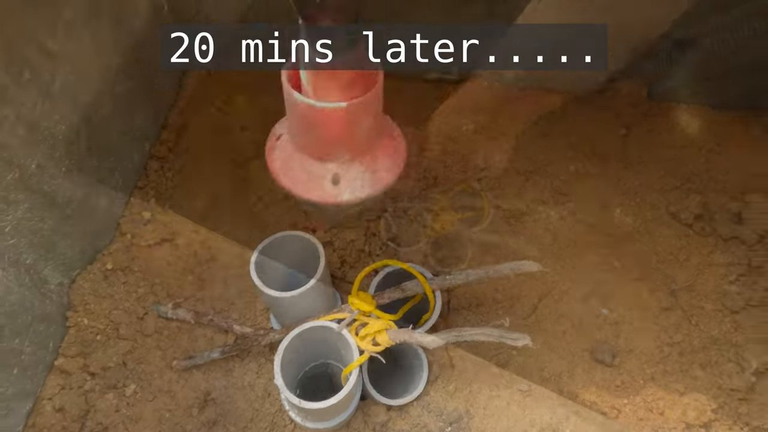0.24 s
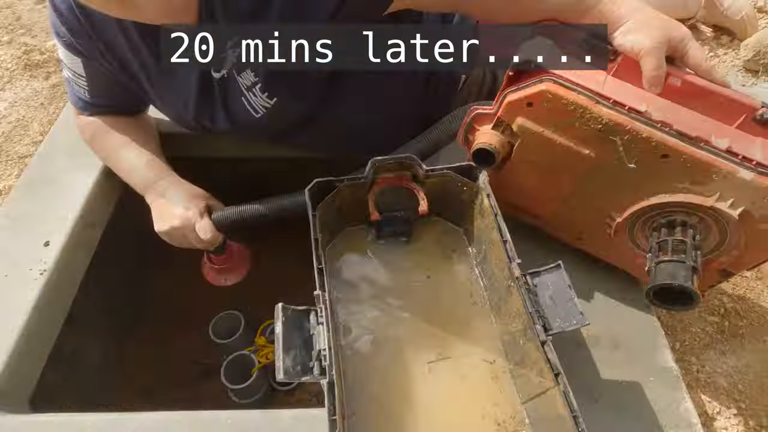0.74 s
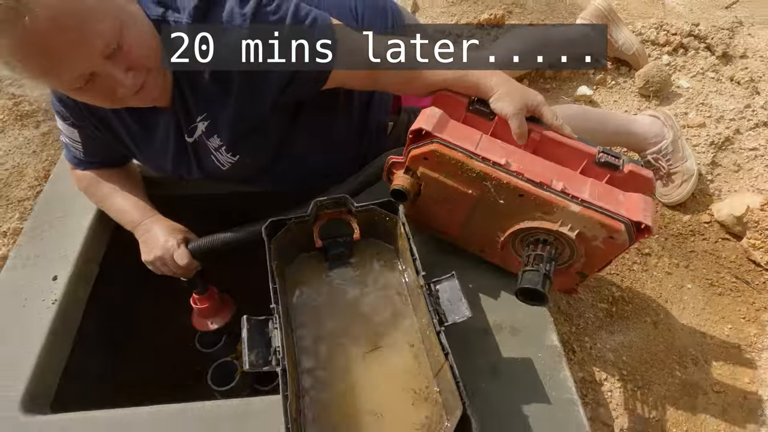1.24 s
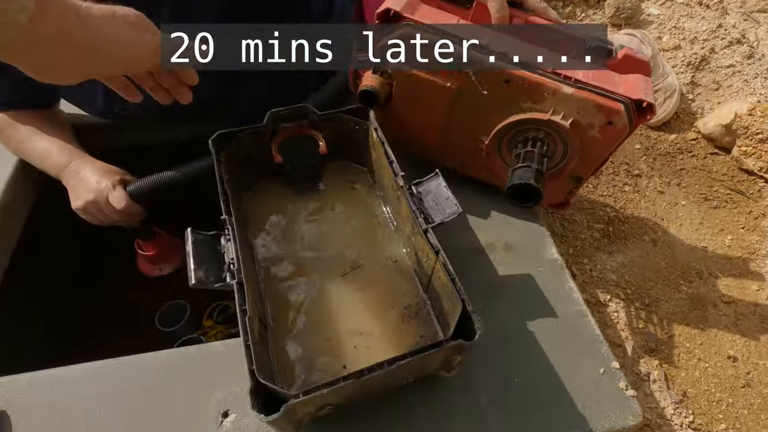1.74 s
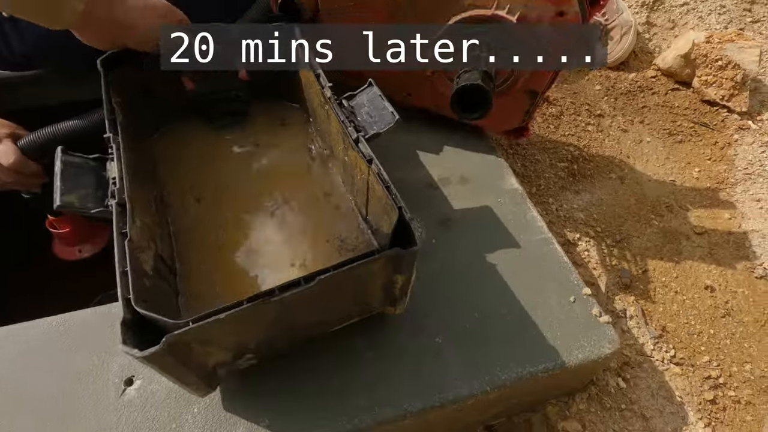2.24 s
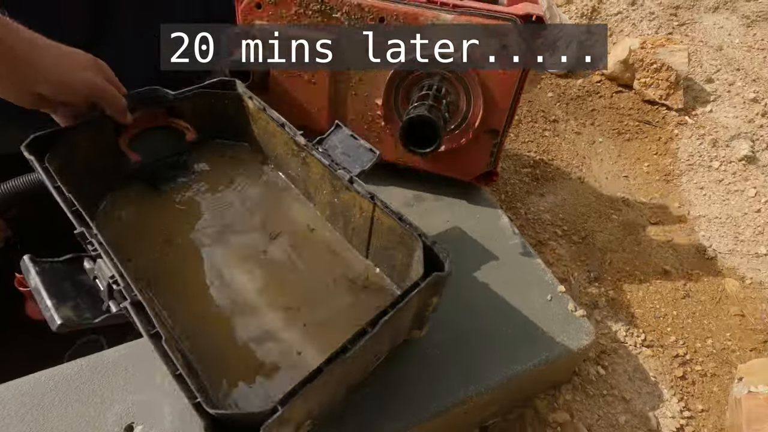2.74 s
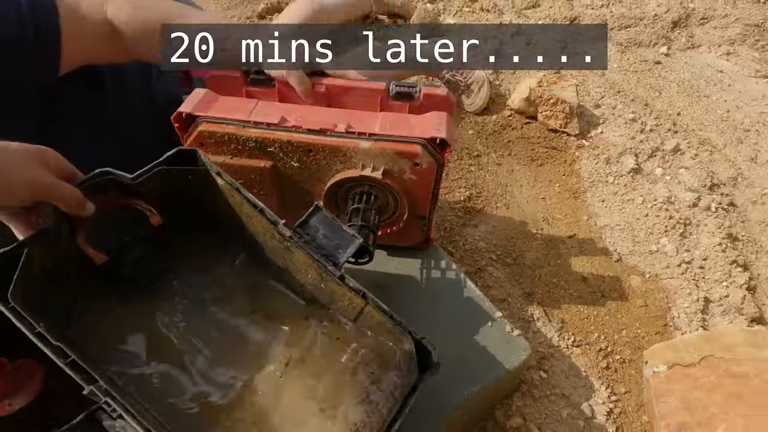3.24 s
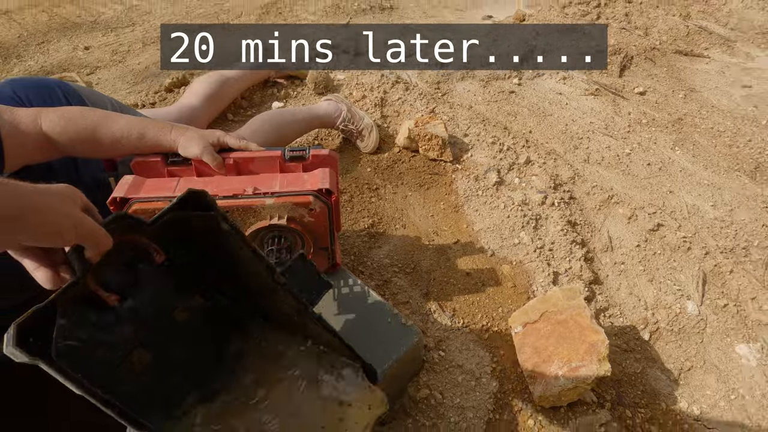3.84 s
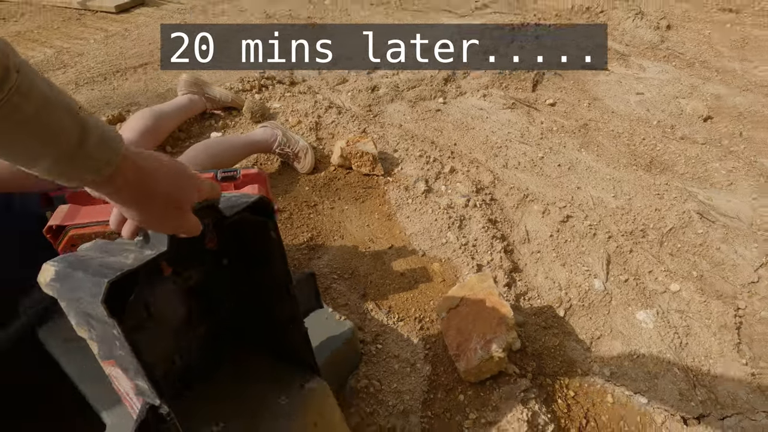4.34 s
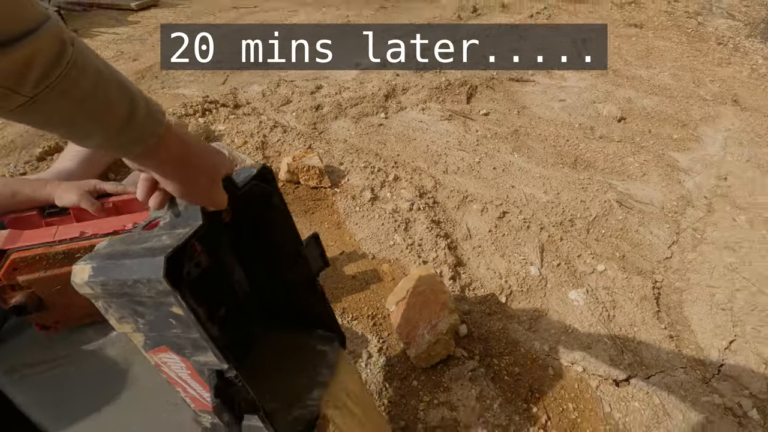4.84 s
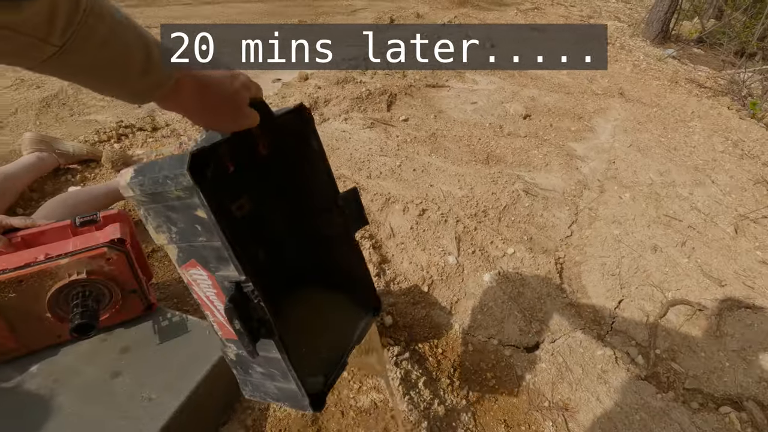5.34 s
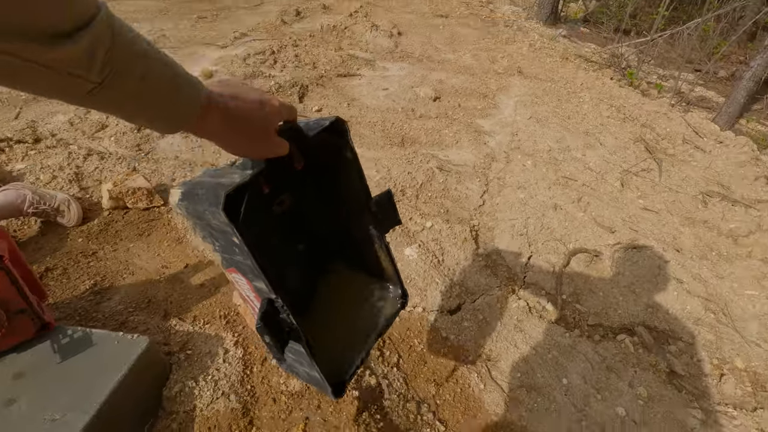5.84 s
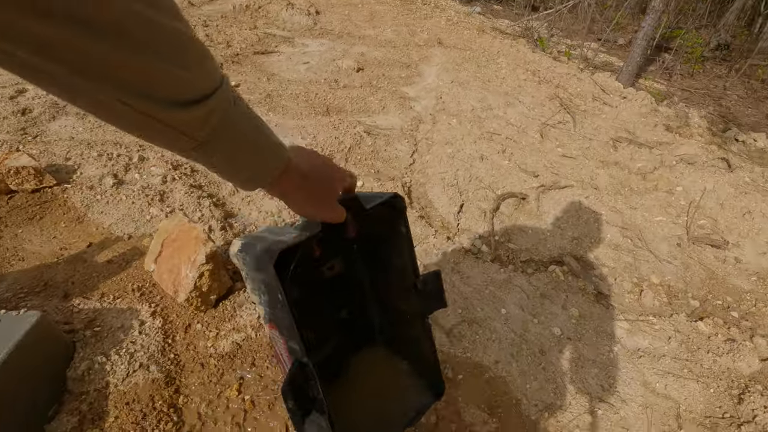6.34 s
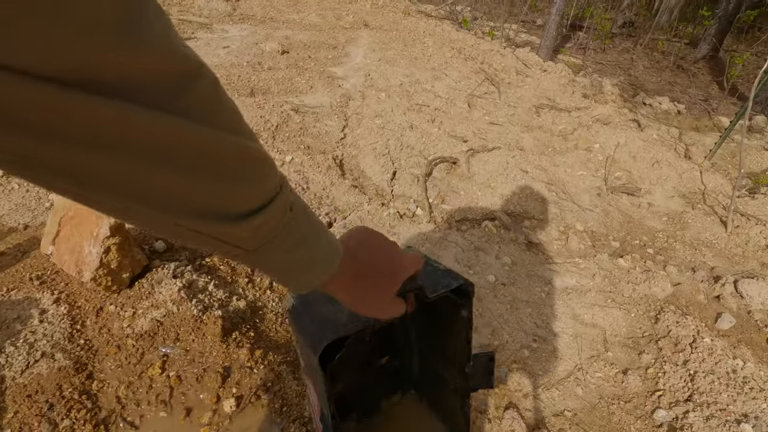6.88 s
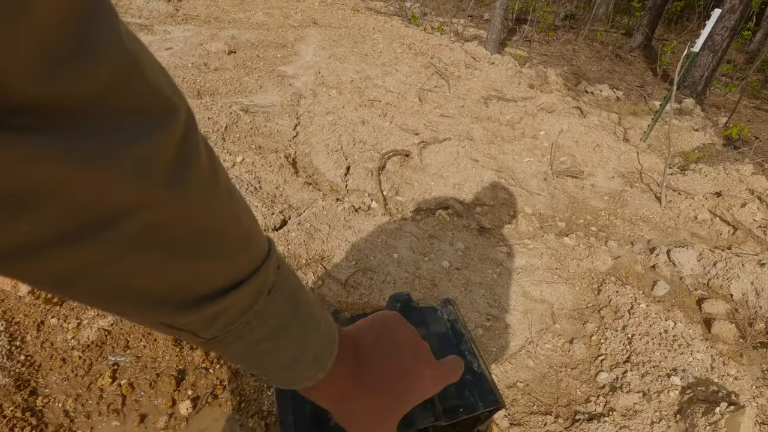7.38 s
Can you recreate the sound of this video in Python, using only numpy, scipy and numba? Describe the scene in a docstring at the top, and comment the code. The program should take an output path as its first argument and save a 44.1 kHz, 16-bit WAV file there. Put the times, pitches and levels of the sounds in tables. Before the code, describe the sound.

A small wet vacuum whines and gurgles, cuts off abruptly, then a plastic tub scrapes over concrete, muddy water pours onto dirt and drips away.

```python
"""Outdoors at a pit: a small wet vacuum whines (shaft and blade tones, turbulent air, gurgling hose) until a hard cut.
After it a far engine idles on wavering harmonics over a murmur of noise. A plastic tub of muddy water is dragged over
a concrete box, tipped and poured on dry ground, and set down: slips and bumps ring its walls, grit rustles, and the
water is built of rising bubbles, fizz and short smacks. Something hollow is knocked now and then, as short modal rings."""
import sys
import numpy as np
from scipy import signal
from scipy.fft import rfft, irfft, next_fast_len
from scipy.io import wavfile
from numba import njit

SR = 44100
rng = np.random.default_rng(int(sys.argv[2]) if len(sys.argv) > 2 else 0)


def volts_from_decibels(level):
    """Turn decibel levels (scalar or array-like) into linear amplitude factors."""
    exponent = np.asarray(level, float) / 20
    return 10 ** exponent


def waveform_to_disk(signal):
    """Save audio, clipped to [-1, 1], as 16-bit WAV at the path in sys.argv[1]."""
    frames = np.transpose(np.atleast_2d(signal))
    scaled = np.clip(frames, -1, 1) * 32767
    samples = np.round(scaled).astype(np.int16)
    wavfile.write(sys.argv[1], SR, samples)


N = 335601
CUT_S = 1.2885   # the vacuum stops and the open-air bed starts

# Open-air bed, whose whole level dips and recovers: [t/s, engine cycle f/Hz, bed level/dB]
OPEN_AIR_BED = [(1.29, 22.12, -51.5), (2.5, 22.35, -51), (3.2, 22.04, -59), (3.85, 22.2, -55.5),
                (4.5, 22.23, -50), (5.3, 22.35, -50), (6.1, 22.83, -50), (6.6, 22.6, -51),
                (7.2, 22.17, -59.5), (7.61, 22.33, -52)]
# Engine harmonics: [multiple of the cycle, relative level/dB]
ENGINE_ORDERS = [(1, -36), (2, -12), (3, -12), (4, -10), (5, -7), (6, -18), (7, -15), (8, -3), (9, -4),
                 (10, -2), (11, -7), (12, -1), (13, -6), (14, -8), (15, -14), (16, -11), (17, -13),
                 (18, -20), (19, -18), (20, -16)]
# Spectrum of the open-air murmur: [f/Hz, relative level/dB per Hz]
MURMUR_SPECTRUM = [(30, -22), (60, -17), (110, -18), (250, -13), (400, -17), (800, -17), (1500, -20),
                   (2150, -18), (2700, -23), (5000, -31), (7000, -39), (8500, -52), (10800, -48),
                   (12500, -60), (14200, -72)]
# Rustle of hands and grit: [peak t/s, level/dB, t/s to rise 20 dB, t/s to fall 20 dB]
RUSTLES = [(1.8, -62, 3., .25), (2.28, -54, .4, .5), (3.6, -62, .8, .5), (7.12, -59, .2, .4),
           (7.35, -55, .25, 1.4)]
# Spectrum of grit: [f/Hz, relative level/dB per Hz]
GRIT_SPECTRUM = [(500, -33), (1000, -12.5), (2800, -11), (5000, -19), (7300, -31), (8800, -40),
                 (11000, -33.5), (12800, -56), (14200, -58)]
# Modes the hollow knocks ring with: [f/Hz, relative level/dB, t60/s]
HOLLOW_MODES = [(430, -6.5, 0.12), (532.4, 5, 0.1), (640, 6, 0.045), (690, -21, 0.056), (843, 5.5, 0.035),
                (1054, -11.5, 0.057), (1430, -3, 0.019), (1500, -7.5, 0.04), (1620, -11, .025)]
# Hollow knocks: [t/s, relative level/dB, hardness/dB per octave]
HOLLOW_KNOCKS = [(1.419, -44, 5), (1.496, -25, 5.5), (1.505, -34.5, 2), (1.967, -31.5, 12),
                 (2.035, -48, 16), (4.713, -31.5, -3), (5.335, -28, 3.5), (5.926, -32.5, 6),
                 (6.281, -44.5, 13), (6.54, -30.5, 1.5), (7.019, -35, 4), (7.156, -39, 4)]
# Air rushing through the vacuum housing: [f/Hz, relative level/dB per Hz]
RUSH_SPECTRUM = [(310, -22), (520, -8), (1260, -8), (1960, -0.5), (2970, -4.5), (3660, -5.5), (7110, -14),
                 (8990, -22.5), (11100, -18.5), (14200, -42)]
# Resonances of the vacuum housing: [f/Hz, width/Hz, relative level/dB]
HOUSING_MODES = [(1544, 17, 4.5), (1860, 40, -3), (1957, 28, 0), (2110, 47, -4), (2644, 45, 0),
                 (3120, 57, -1.5), (3290, 34, 4), (3460, 52, -0.5), (6220, 40, 0), (6670, 50, 0),
                 (7390, 60, 0), (6880, 60, 3)]
# Water rumbling in the hose: [f/Hz, relative level/dB per Hz]
GURGLE_SPECTRUM = [(24, -50), (40, -8), (112, -13), (212, 0), (254, -3.5), (294, -8.5), (400, -9.5),
                   (520, -43), (880, -120)]
# Chatter of the rim and singing of one wall mode: [t/s, length t/s, f/Hz, level/dB]
RIM_SQUEAKS = [(2.39, 0.045, 560, -50), (2.505, 0.045, 680, -51), (2.561, 0.033, 700, -46),
               (2.609, 0.03, 702, -45), (1.977, .17, 2140, -63.5), (2.722, 0.056, 1280, -38)]
# Shoves over concrete and soil: [peak t/s, level/dB, t/s to rise 20 dB, t/s to fall 20 dB, bite level/dB of the ribs]
SHOVES = [(2.64, -50, .5, .12, 0.), (2.73, -45, .05, .2, 5.), (2.772, -35, .07, .03, -3.),
          (2.82, -42, .06, .06, -6.), (2.87, -47, .03, .2, 11.), (2.97, -48, .2, .08, 3.),
          (3.05, -49, .06, .1, 6.), (3.105, -48, .12, .03, -6.), (4.024, -47, .19, .09, -10.),
          (6.946, -40.5, .055, .09, -4.), (7.05, -50, .03, .04, 3.), (7.25, -53, .02, .45, 2.)]
# Modes of the plastic walls: [f/Hz, relative level/dB, t60/s after a bump]
TUB_MODES = [(135, -19.5, 0.16), (165, -22., 0.1), (199.4, -8.5, 0.12), (266, 1, 0.083), (345, -.5, 0.11),
             (452, -19, 0.045), (556, 5.5, 0.045), (702, 4, 0.03), (828, 1.5, 0.026), (900, 0.5, 0.021),
             (1082, 4, 0.02), (1280, -9.5, 0.04), (1600, -10, 0.047)]
# Tub bumps: [t/s, relative level/dB, favoured region f/Hz, relative crack level/dB]
TUB_BUMPS = [(0.17, -17, 800, -42), (0.177, -19, 190, -47), (0.192, -23, 600, -50), (1.56, -23.5, 234, -55),
             (1.578, -27.5, 267, -49), (2.575, -24.5, 134, -57), (2.68, -32, 600, -52),
             (2.694, -32, 800, -47), (2.702, -16, 221, -52), (2.755, -23, 230, -46), (2.773, -13, 267, -58),
             (2.817, -20, 250, -39), (2.857, -9, 165, -30), (2.886, -15, 140, -33), (2.9, -26, 650, -44),
             (2.916, -25, 291, -42), (2.936, -19.5, 293, -34), (2.957, -40, 600, -45),
             (2.972, -23, 650, -35), (3.006, -40, 280, -42), (3.039, -40, 500, -45),
             (3.043, -17.5, 170, -46), (3.051, -42, 500, -47), (3.065, -42, 300, -45),
             (3.08, -35, 129, -42), (3.089, -25, 140, -56), (3.113, -39, 137.1, -51),
             (5.999, -34, 450, -52), (6.93, -34, 150, -59), (6.943, -29.5, 359, -51),
             (6.968, -39, 300, -53), (7.046, -26, 342, -56), (7.118, -32, 280, -55), (7.235, -17, 620, -48),
             (7.241, -17, 370, -52), (7.256, -19, 380, -44), (7.275, -32, 900, -52), (7.321, -23, 220, -45),
             (7.368, -20, 600, -49), (7.399, -30, 340, -56), (7.413, -31, 400, -58)]
# A bump lands as three growing touches: [relative level/dB]
TOUCH_LEVELS = [-7, -3, 0]
# The edge skids and hisses: [peak t/s, level/dB, t/s to rise 20 dB, t/s to fall 20 dB]
EDGE_SKID = (2.772, -45, .07, .008)
# Spectrum of splashing water: [f/Hz, relative level/dB per Hz]
SPLASH_SPECTRUM = [(260, -16), (450, -48), (543, -21), (640, -26), (1400, -14), (2470, 1.5), (4220, 5.5),
                   (7100, -13), (8940, -28.5), (10900, -17), (14200, -50)]
# The tilt lets the water out: [t/s, nominal splash level/dB]
POUR = [(3.96, -80), (4.01, -55), (4.06, -48), (4.14, -48), (4.21, -43), (4.29, -43.5), (4.34, -39),
        (4.42, -37), (4.68, -37.5), (4.8, -40.5), (4.9, -37), (5.26, -45.5), (5.52, -50), (5.73, -54),
        (5.88, -64), (6.22, -75), (6.9, -78)]
# Last gushes shaken over the rim: [peak t/s, level/dB, t/s to rise 20 dB, t/s to fall 20 dB]
RIM_GUSHES = [(5.36, -48, .03, .15), (6.045, -54, .03, .1), (6.31, -47.5, .035, .27),
              (6.585, -45.5, .03, .18)]
# Single bubbles of sloshing water, low and high: [t/s, level/dB, starting f/Hz, length/cycles, pitch rise/share]
SLOSH_BUBBLES = [(3.323, -49, 1250, 75, 0.89), (3.394, -47, 750, 10, .08), (3.503, -44.5, 1774, 28, .04),
                 (3.548, -43.5, 2340, 20, 0.06), (3.627, -47, 1810, 30, .15), (3.47, -48, 500, 10, .04),
                 (3.672, -53, 1700, 70, .8), (4.219, -33, 2800, 16, .3), (4.32, -32, 4100, 20, .1),
                 (4.394, -28, 2750, 14, .1), (4.421, -25, 3300, 14, .2), (4.572, -31, 2500, 12, .2),
                 (4.64, -28, 2200, 22, .25), (4.682, -31, 1900, 12, .2), (4.135, -44, 900, 5.3, 0.84),
                 (4.503, -32.5, 640, 5.3, 0.28), (4.516, -22.5, 2350, 15, 0.92),
                 (4.55, -27, 2740, 14, 0.54), (4.809, -37.5, 820, 11, 0.26), (5.02, -37.5, 797, 8.7, .3),
                 (6.109, -43, 1200, 10, .15), (7.064, -42, 2870, 25, .05), (7.104, -41, 2470, 22, .12),
                 (3.586, -48, 835, 18, .06), (3.609, -48, 2950, 18, .12)]
# Short bright smacks, mostly drops, also the snap of a knock and cracks of the tub:
# [t/s, relative level/dB, relative f/Hz]
BRIGHT_SMACKS = [(1.505, -40, 5000), (3.3298, -43, 3300), (3.475, -50, 7000), (3.5728, -40, 4000),
                 (3.8222, -48, 4400), (4.059, -36, 6000), (4.093, -39, 2200), (4.121, -38, 2708),
                 (4.252, -27, 2205), (4.2689, -25, 2680), (4.3075, -25, 3080), (5.1125, -22, 4040),
                 (5.5937, -27.5, 3000), (5.622, -31, 3490), (5.7633, -19.5, 3580), (5.777, -35, 4600),
                 (5.8027, -31.5, 2900), (5.814, -37, 4200), (5.858, -38, 3800), (6.418, -36, 5200),
                 (5.918, -36, 4000), (5.953, -36.5, 3970), (6.0307, -34, 5500), (6.056, -35, 5000),
                 (6.135, -39, 5000), (6.0781, -27, 4020), (6.0869, -22.5, 3820), (6.312, -30, 4900),
                 (6.3861, -31, 4440), (6.4814, -33, 3930), (6.541, -23.5, 2800), (6.617, -34, 3700),
                 (6.76, -38, 4600), (6.792, -41, 3400), (6.828, -45, 5000), (6.855, -46, 5700),
                 (6.92, -41, 4500), (6.942, -36, 2530), (6.965, -39, 4700), (7.257, -34, 4900),
                 (7.334, -33, 2300), (7.5856, -41, 3810)]
# Runs of small drips: [start t/s, length t/s, relative level/dB, relative f/Hz]
DRIP_RUNS = [(5.44, .46, -37, 3900), (6.28, .22, -37, 4300)]
# Side signal (half the left-right difference) against the middle: [f/Hz, relative level/dB]
SIDE_SPECTRUM = [(60, -71), (1000, -36), (5000, -29), (8500, -20), (10000, -22), (12500, -2)]


def rms_one(x):
    """Scales to unit rms."""
    return x / np.sqrt(np.mean(x ** 2) + 1e-20)


def in_time(rows):
    """Draws table columns as curves, one value per sample."""
    s, *columns = np.transpose(rows)
    return [np.interp(np.arange(N) / SR, s, c) for c in columns]


def colour(x, points):
    """Shapes a signal by a spectrum, straight lines in dB over log frequency."""
    size = next_fast_len(N)
    hz = np.maximum(np.fft.rfftfreq(size, 1 / SR), 1)
    table = np.array(points)
    gain = volts_from_decibels(np.interp(np.log(hz), np.log(table[:, 0]), table[:, 1]))
    return irfft(rfft(x, size) * gain, size)[:N]


def white():
    """White noise of spread 1."""
    return rng.standard_normal(N)


def drift(rate):
    """Slow random wander of spread 1: noise through two poles at rate Hz, drawn every 40 samples."""
    r = np.exp(-80 * np.pi * rate / SR)
    noise = rng.standard_normal(N // 40 + 2002)
    slow = signal.lfilter([1], [1, -2 * r, r * r], noise)[2000:]
    return np.interp(np.arange(N) / 40, np.arange(len(slow)), rms_one(slow))


def butter(x, order, hz, kind):
    """Butterworth filter."""
    return signal.sosfilt(signal.butter(order, hz, kind, fs=SR, output="sos"), x)


def ring(clicks, hz, t60):
    """A unit click sets a sine of starting height 1 ringing."""
    r, w = volts_from_decibels(-60 / (t60 * SR)), 2 * np.pi * hz / SR
    return signal.lfilter([0, np.sin(w)], [1, -2 * r * np.cos(w), r * r], clicks + 1e-18)


def swell(clicks, hz, t60, cycles):
    """A yielding blow: the mode is driven through a brief resonance of its own and takes a few cycles to bloom."""
    driven = ring(ring(clicks, hz, t60), hz, cycles / hz)
    return driven * 2 * np.log(1000) * hz / (cycles * SR)


def decay(clicks, t60):
    """Each click becomes an exponentially dying envelope."""
    return signal.lfilter([1], [1, -volts_from_decibels(-60 / (t60 * SR))], clicks)


def soft(x, hz):
    """A yielding contact: double one-pole low-pass."""
    r = np.exp(-2 * np.pi * hz / SR)
    return signal.lfilter([(1 - r) ** 2], [1, -2 * r, r * r], x)


def surge(s, db, rise_s, fall_s):
    """A level that climbs to its peak and sinks again, evenly in dB."""
    late = np.arange(N) / SR - s
    return volts_from_decibels(db + 20 * np.where(late < 0, late / rise_s, -late / fall_s))


def grains(per_s, spread_db):
    """Random clicks of uneven size, scaled toward unit mean power."""
    share = np.clip(per_s / SR, 1e-6, 1)
    heights = volts_from_decibels(spread_db * np.minimum(rng.exponential(1, N), 5))
    sizes = rms_one(heights * rng.choice([-1, 1], N))
    return sizes * (rng.random(N) < share) / np.sqrt(share)


def strikes(at_s, sizes):
    """One click per blow."""
    clicks = np.zeros(N)
    np.add.at(clicks, np.round(np.asarray(at_s) * SR).astype(int), sizes)
    return clicks


@njit
def add_bubbles(out, at, size, hz, cycles, rise, sr):
    """Each bubble is a swelling and dying sine whose pitch climbs as it nears the surface."""
    for k in range(len(at)):
        phase, step = 0.0, hz[k] / sr
        for i in range(at[k], len(out)):
            done = phase / cycles[k]
            if done > 1:
                break
            phase += step * (1 + rise[k] * done ** 1.5)
            out[i] += size[k] * min(8 * done, 1.0) * (1 - done) * np.sin(2 * np.pi * phase)


def surroundings():
    """Engine orders waver a little on their way through the air; they and the murmur share one level that dips."""
    cycle_hz, level_db = in_time(OPEN_AIR_BED)
    turn = 2 * np.pi * np.cumsum(cycle_hz) / SR
    engine = 0
    for k, db in ENGINE_ORDERS:
        level = volts_from_decibels(db + .12 * k * drift(1.2) + drift(3))
        phase = 1.2 * rng.normal() + .03 * k * drift(3)
        engine = engine + level * np.sin(k * turn + phase)
    murmur = rms_one(colour(white(), MURMUR_SPECTRUM))
    bed = rms_one(engine) + volts_from_decibels(-4.5) * murmur
    return volts_from_decibels(level_db) * bed * (np.arange(N) >= CUT_S * SR)


def rustle():
    """Hands and grit make dense fine grains that come in clumps."""
    clumps = grains(6000 * volts_from_decibels(4.3 * drift(20)), spread_db=4.5)
    fine = rms_one(colour(clumps, GRIT_SPECTRUM))
    return sum(surge(*row) for row in RUSTLES) * fine * (np.arange(N) >= CUT_S * SR)


def knocks():
    """A hard blow wakes the upper modes more; every blow adds a short crack, and the ground echoes it."""
    s, peak_db, hardness = np.transpose(HOLLOW_KNOCKS)
    luck = rng.normal(0, 1, (len(s), 2 * len(HOLLOW_MODES)))
    rings = 0
    for k, (hz, db, t60) in enumerate(HOLLOW_MODES):
        tilt_db = hardness * np.log2(hz / 800)
        sizes = volts_from_decibels(peak_db + db + tilt_db + 2.8 * luck[:, 2 * k] - 8.) * np.sign(luck[:, 2 * k + 1])
        rings = rings + swell(strikes(s, sizes), hz, t60, cycles=8.7)
    crack = decay(strikes(s, volts_from_decibels(peak_db - 17)), t60=0.048)
    noise = rms_one(soft(colour(white(), GRIT_SPECTRUM), hz=5000))
    blows = rings + soft(crack, hz=300) * noise
    return blows + volts_from_decibels(-7.5) * np.roll(blows, round(.0085 * SR))   # ground echo


def vacuum():
    """Shaft and blade tones over turbulent air; the motor slows as water fills the hose, where it rumbles."""
    loaded_hz, free_extra_hz, settle_s, blades = 442.6, 19., .4, 8
    throb_db, throb_s, throb_top_s = 3.5, .66, .45   # slow swing of the blade tone either way, period, a crest
    t = np.arange(N) / SR
    free = np.exp(-t / settle_s)   # share of the load still missing
    shaft_hz = loaded_hz + free_extra_hz * free
    turn = 2 * np.pi * np.cumsum(shaft_hz * (1 + 0.00074 * drift(21))) / SR
    shaft = volts_from_decibels(-28. - .8 * free + 0.5 * drift(27)) * (np.sin(turn) + volts_from_decibels(-33) * np.sin(2 * turn))
    # the blade tone grows under load and throbs slowly
    blade_db = -45. - 7. * free + throb_db * np.cos(2 * np.pi * (t - throb_top_s) / throb_s)
    blade = volts_from_decibels(blade_db + 1.9 * drift(30)) * np.sin(blades * turn + .5 * drift(5))
    air = colour(white(), RUSH_SPECTRUM)
    lift = 0
    for hz, width, db in HOUSING_MODES:
        resonance = ring(air, hz, np.log(1000) / np.pi / width) * width * 2 * np.pi / SR
        lift = lift + volts_from_decibels(db + 1 + 3.3 * drift(4.)) * resonance
    rush = rms_one(air + lift) * volts_from_decibels(-38.5 + 1.5 * free + .6 * drift(5.6))
    gurgle = rms_one(colour(white(), GURGLE_SPECTRUM)) * volts_from_decibels(-48. - 3. * free + 2.8 * drift(32))
    return (np.sqrt(2) * (shaft + blade) + rush + gurgle) * (np.arange(N) < CUT_S * SR)


def squeaks():
    """Fast slips drive one narrow resonance for a moment."""
    out, t = 0, np.arange(N) / SR
    slips = grains(600, spread_db=3.0)
    for s, length, hz, db in RIM_SQUEAKS:
        gate = np.interp(t, [s, s + 0.0096, s + length - .008, s + length], [0, 1, 1, 0])
        out = out + volts_from_decibels(db) * gate * rms_one(ring(slips, hz, 0.045))
    return out


def bump_rings():
    """A bump touches three times and rings the plastic walls, most of all near the region it hits."""
    touch_gap_s = .0005
    s, peak_db, region_hz, _ = np.transpose(TUB_BUMPS)
    luck = rng.normal(0, 1, (len(s), len(TUB_MODES), 4))
    touch_s = s[:, None] + touch_gap_s * np.array([-1, 0, 1])
    bumps = 0
    for k, (hz, db, t60) in enumerate(TUB_MODES):
        near_db = -10.5 * np.abs(np.log2(hz / region_hz))
        mode_db = peak_db + 0.33 * db + near_db - 13.
        touch_db = mode_db[:, None] + TOUCH_LEVELS + 1.5 * luck[:, k, :3]
        sizes = volts_from_decibels(touch_db) * np.sign(luck[:, k, 3:])
        bumps = bumps + swell(strikes(touch_s.ravel(), sizes.ravel()), hz, t60, cycles=2.5)
    return butter(bumps, 2, 105., "high")   # small walls radiate no deep bass


def bump_cracks():
    """Each bump snaps brightly, ticks in the treble and crunches dully; the skidding edge hisses."""
    s, peak_db, _, crack_db = np.transpose(TUB_BUMPS)
    snap = decay(strikes(s, volts_from_decibels(crack_db + 3.)), t60=.018)
    crunch = decay(strikes(s, volts_from_decibels(crack_db + 3.)), t60=.055)
    # the tick grows as the snap outweighs the thud
    tick_db = crack_db - 3. + .7 * (crack_db - peak_db)
    tick = decay(strikes(s, volts_from_decibels(tick_db)), t60=.014)
    sand = colour(white(), GRIT_SPECTRUM)
    hiss = rms_one(np.diff(sand, prepend=0))
    dull = rms_one(butter(colour(grains(2500., spread_db=3.5), GRIT_SPECTRUM), 2, 3000., "low"))
    out = (tick + surge(*EDGE_SKID)) * hiss
    out = out + soft(snap, hz=2500) * rms_one(soft(sand, hz=9000.))
    return out + volts_from_decibels(-4.) * soft(crunch, hz=400) * dull


def drag():
    """Slips of the dragged bottom rub the wall modes, low panels and higher ribs, over grinding grit."""
    concrete_grit_db, soil_grit_db, soil_from_s = -10., -14., 3.5
    grit = grains(8000 * volts_from_decibels(6. * drift(30)), spread_db=4.0)
    grit = rms_one(colour(grit, GRIT_SPECTRUM))
    panels, ribs = 0, 0
    for hz, db, t60 in TUB_MODES:
        slips = grains(400 * volts_from_decibels(3.5 * drift(11)), spread_db=4.5)
        rubbed = volts_from_decibels(db) * ring(slips, hz, 0.65 * t60)   # rubbed walls ring shorter
        if hz < 500:
            panels = panels + rubbed
        else:
            ribs = ribs + rubbed
    panels, ribs = rms_one(panels), rms_one(ribs)
    out = 0
    for *shove, bite_db in SHOVES:
        grit_db = concrete_grit_db if shove[0] < soil_from_s else soil_grit_db
        out = out + surge(*shove) * (panels + volts_from_decibels(bite_db) * ribs + volts_from_decibels(grit_db) * grit)
    return out


def tub():
    """Drag slips and single bumps ring the same plastic walls; each bump also cracks."""
    return bump_rings() + bump_cracks() + drag()


def trickle():
    """Water running along the tilted wall lets off scattered small bubbles."""
    out, draw = np.zeros(N), rng.random((120, 4))
    at = ((3.44 + .28 * draw[:, 0]) * SR).astype(np.int64)
    sizes = volts_from_decibels(-58 + 9. * draw[:, 1] ** 2)
    hz = 1100 * 2 ** (1.6 * draw[:, 2])
    add_bubbles(out, at, sizes, hz, 4 + 14 * draw[:, 3] ** 2, .3 * draw[:, 1], SR)
    return out


def stream():
    """The stream breaks into fizz and bubbles; a thin flow gives fewer, smaller ones."""
    full_db = -37   # splash of the full stream
    t = np.arange(N) / SR
    poured = volts_from_decibels(in_time(POUR)[0]) * (t > POUR[0][0]) * (t < 6.95)
    splash_db = 20 * np.log10(poured + sum(surge(*row) for row in RIM_GUSHES) + 1e-9)
    # a thinner flow has less deep slosh and more mist beside its bubbles
    thin_db = np.clip(splash_db - full_db, -18, 0)
    deep_db, mist_db = -3. + 1.2 * thin_db, -13.5 - .5 * thin_db
    flow = np.clip(volts_from_decibels(splash_db + 34), .08, 1.2)
    per_s = 3500 * flow ** .7
    at = np.flatnonzero(rng.random(N) < per_s * volts_from_decibels(2.5 * drift(22)) / SR)
    draw = rng.random((N, 5))[at]
    sizes = volts_from_decibels(5.1 * np.minimum(-np.log(draw[:, 0] + 1e-9), 2.6)) / np.sqrt(per_s[at])
    hz = 3300 * flow[at] ** -.1 * 2 ** (.95 * (draw[:, 1] - draw[:, 4]))   # crowds around one typical bubble
    bubbles = np.zeros(N)
    add_bubbles(bubbles, at, sizes, hz, 3 + 22 * draw[:, 2] ** 3, .5 * draw[:, 3], SR)
    fizz = colour(grains(12000 * flow, spread_db=3.2) * volts_from_decibels(1.2 * drift(28)), SPLASH_SPECTRUM)
    deep = rms_one(butter(fizz, 3, [450, 1600], "band"))
    middle = rms_one(butter(fizz, 3, [1600, 6000], "band"))
    mist = rms_one(butter(fizz, 3, [6000, 14500], "band"))
    mix = volts_from_decibels(-1.5) * rms_one(bubbles) + volts_from_decibels(-3.) * middle
    mix = mix + volts_from_decibels(deep_db + 1.5 * drift(25)) * deep + volts_from_decibels(mist_db) * mist
    return volts_from_decibels(splash_db) * mix


def slosh():
    """Single bubbles of sloshing water, low and high, stand out one by one."""
    out = np.zeros(N)
    s, peak_db, hz, cycles, rise = np.transpose(SLOSH_BUBBLES)
    add_bubbles(out, (s * SR).astype(np.int64), volts_from_decibels(peak_db), hz, cycles, rise, SR)
    return out


def smacks():
    """Short bright smacks, mostly drops and runs of drips on the ground: a brief chirp and a puff of spatter each."""
    small = []
    for (s, length, db, hz), run in zip(DRIP_RUNS, rng.random((len(DRIP_RUNS), 11, 3))):
        for a, b, c in run:
            small.append((s + length * a, db + 8. * (b - .5), hz * 2 ** (.7 * (c - .5))))
    s, peak_db, hz = np.transpose(BRIGHT_SMACKS + small)
    out, count = np.zeros(N), len(s)
    at = (s * SR).astype(np.int64)
    add_bubbles(out, at, volts_from_decibels(peak_db - 1.5), 0.954 * hz, np.full(count, 5.5), np.full(count, .3), SR)
    spatter = decay(strikes(s, volts_from_decibels(peak_db - 11)), t60=.012)
    return out + soft(spatter, hz=5000) * rms_one(colour(white(), SPLASH_SPECTRUM))


def water():
    """The poured stream, with single bubbles and short smacks standing out of it."""
    return stream() + slosh() + smacks()


def scene():
    """Everything sounds from straight ahead."""
    mid = surroundings() + rustle() + knocks() + vacuum() + squeaks() + tub() + trickle() + water()
    return np.array([mid, mid])


def low_pass(x):
    """Removes everything above the highest recorded frequency."""
    return signal.sosfilt(signal.butter(12, 14340, fs=SR, output="sos"), x)


def record(dry):
    """The microphone cuts the bass, its housing notches the treble; a flickering side signal spreads mostly the top."""
    mid = butter(dry[0], 2, 85., "high")
    mid = signal.lfilter(*signal.iirnotch(9030, 9., fs=SR), mid)
    side = colour(mid, SIDE_SPECTRUM) * drift(120)
    mix = np.array([mid + side, mid - side])
    return low_pass(mix)


dry = scene()
out = record(dry)
waveform_to_disk(out)
```